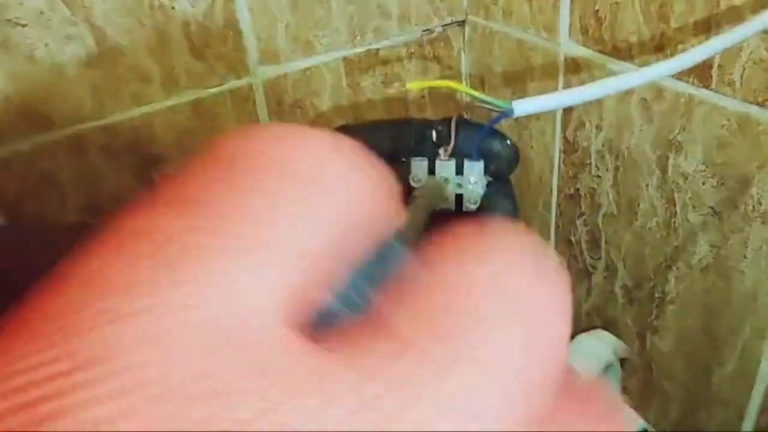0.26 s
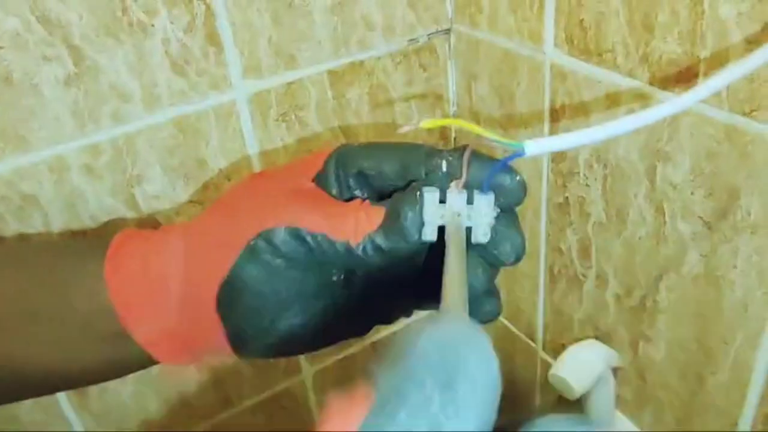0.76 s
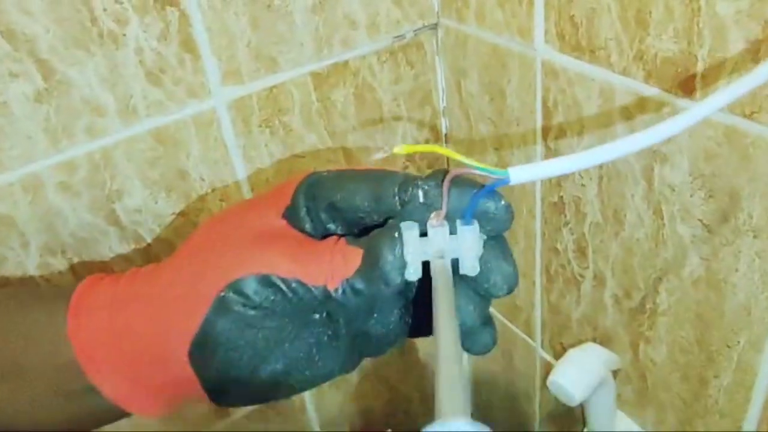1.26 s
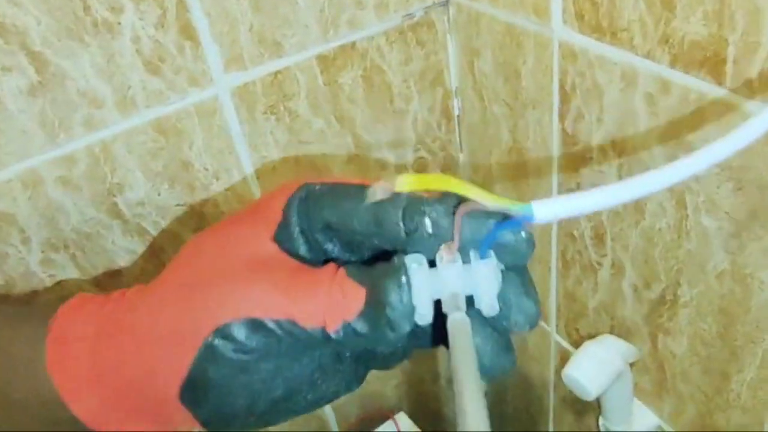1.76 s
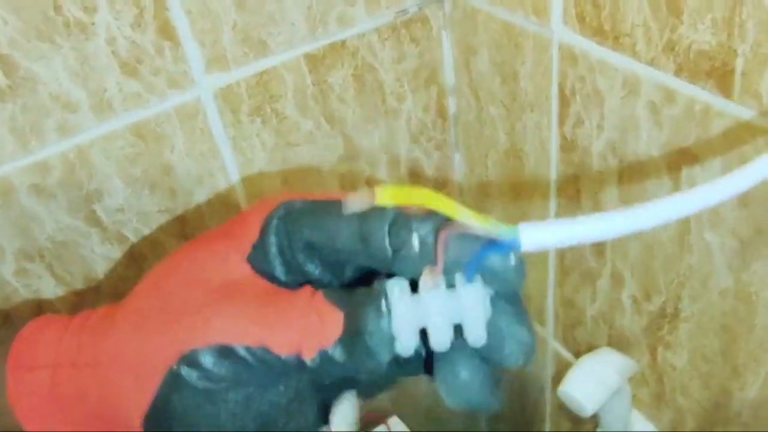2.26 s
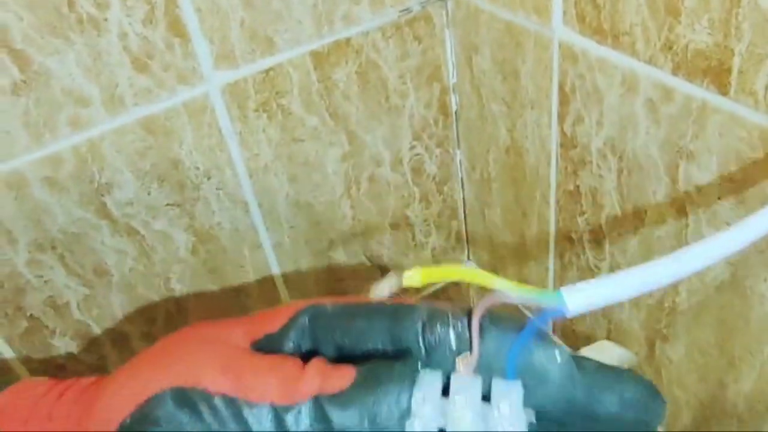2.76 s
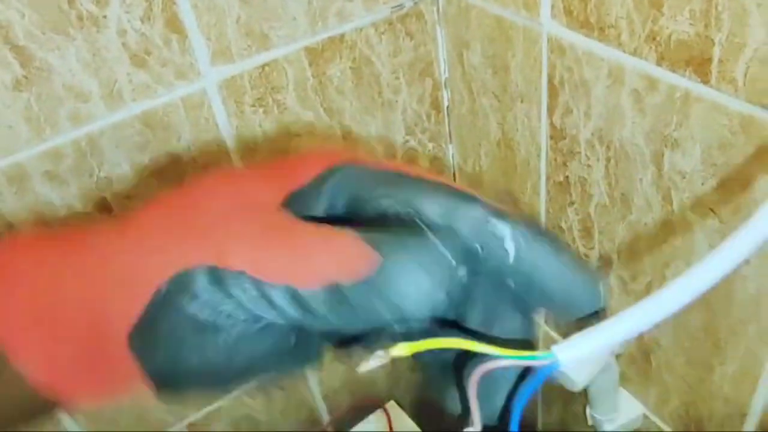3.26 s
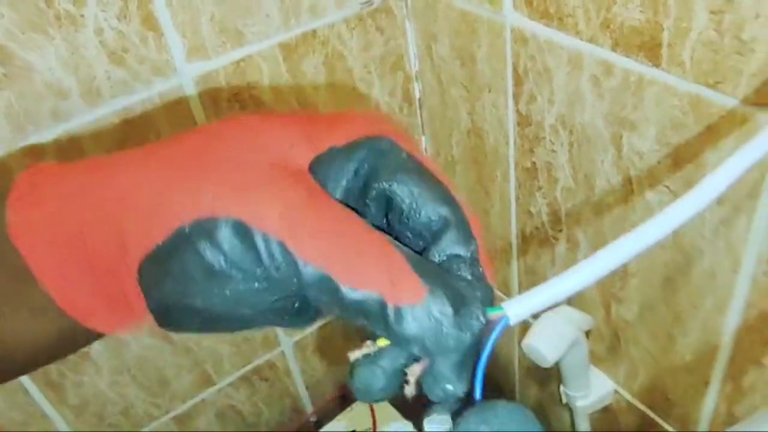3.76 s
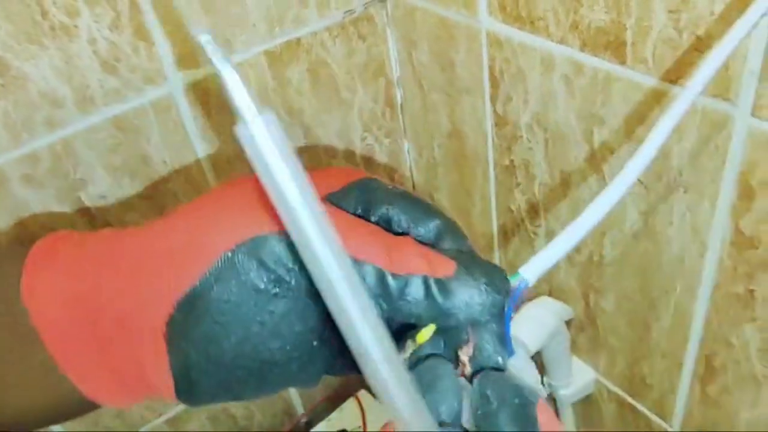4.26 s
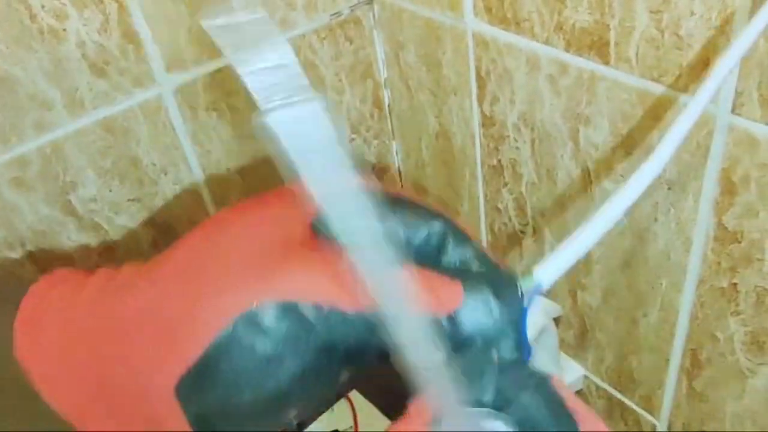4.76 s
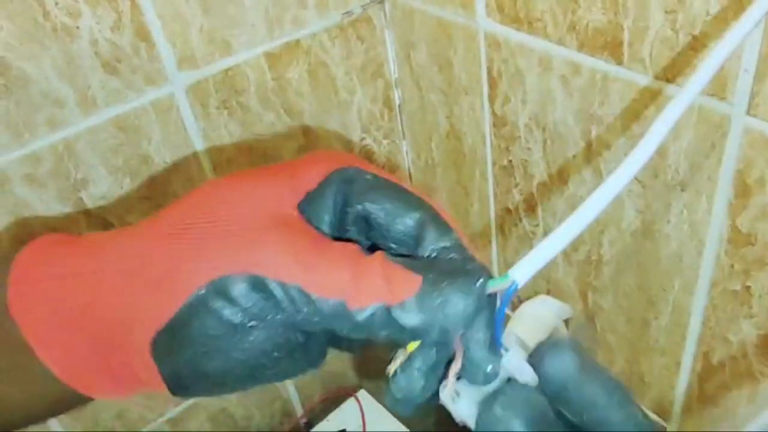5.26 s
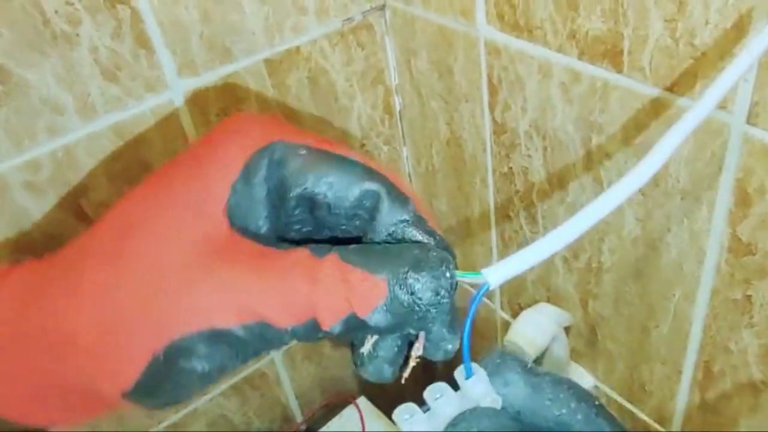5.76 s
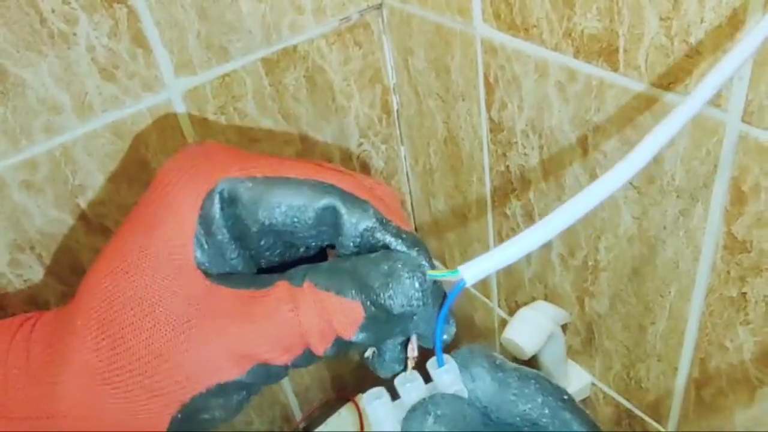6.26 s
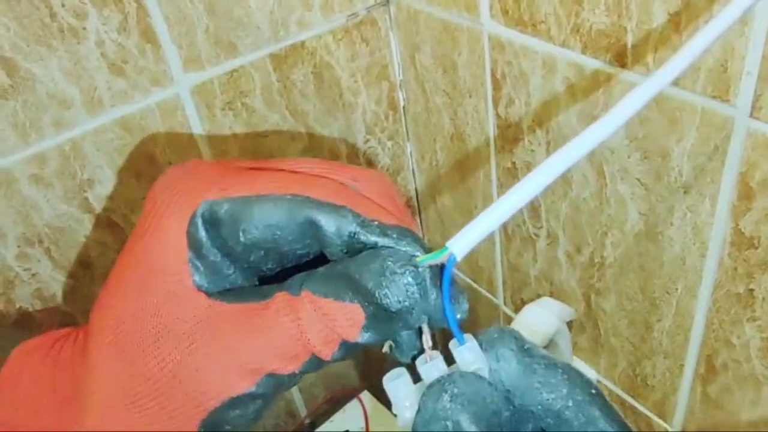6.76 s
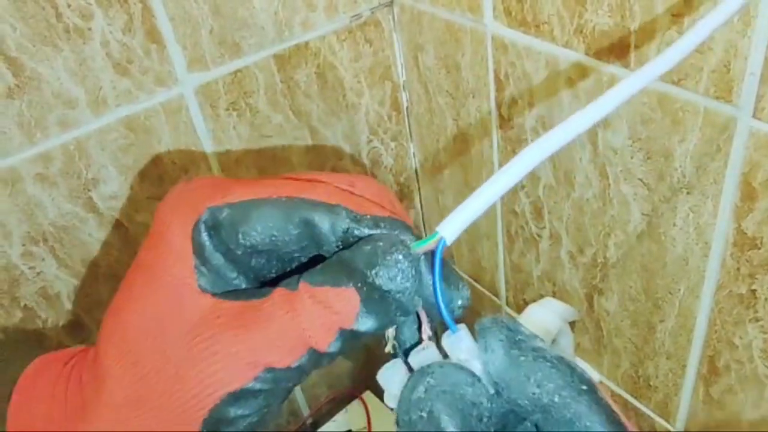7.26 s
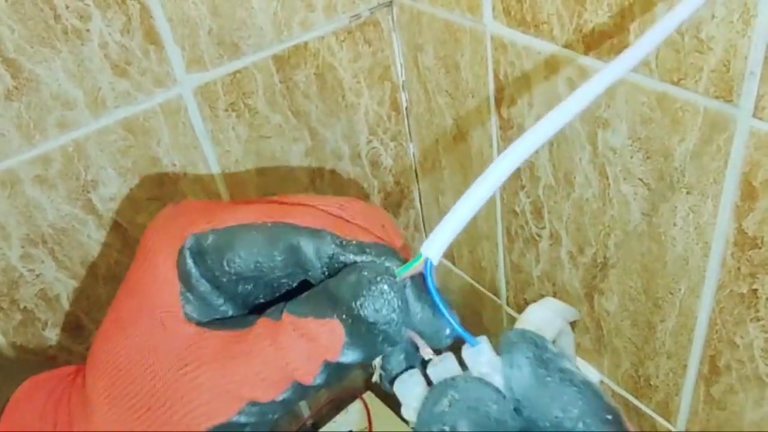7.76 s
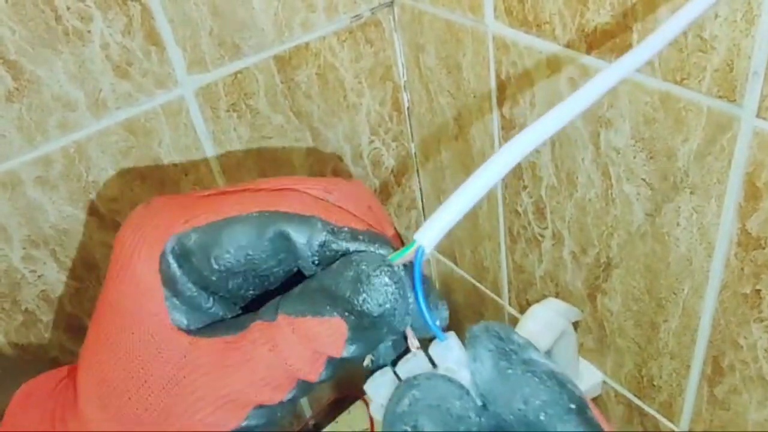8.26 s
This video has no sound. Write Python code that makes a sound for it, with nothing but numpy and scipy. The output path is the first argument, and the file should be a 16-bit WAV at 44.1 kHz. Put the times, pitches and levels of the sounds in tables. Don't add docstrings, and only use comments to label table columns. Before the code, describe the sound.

Close bursts of scratchy rubber-glove creaks and sharp screwdriver clicks over constant fan hum, thinning to light plastic rattles and finally barely audible sticky ticks.

```python
import sys
import numpy as np
from scipy import signal
from scipy.fft import rfft, irfft, next_fast_len
from scipy.io import wavfile
from scipy.ndimage import uniform_filter1d, map_coordinates

SR = 44100
rng = np.random.default_rng(int(sys.argv[2]) if len(sys.argv) > 2 else 0)


def bounce(signal):
    frames = np.transpose(np.atleast_2d(signal))
    limited = np.clip(frames, -1, 1)
    pcm = np.round(limited * 32767).astype(np.int16)
    wavfile.write(sys.argv[1], SR, pcm)


def gain_from_decibels(decibels):
    exponent = np.asarray(decibels, float) / 20
    return 10 ** exponent


N = 375291

# freq_hz, density_db_per_hz
DUCT_RUMBLE = [(25, -75), (45, -74.5), (65, -68), (130, -67.5), (175, -74), (260, -80), (350, -81.5),
               (500, -82), (650, -86), (900, -86.2)]
# freq_hz, density_db_per_hz
AIR_LEFT = [(900, -86.5), (1150, -95), (1400, -92), (1800, -93), (2600, -91.5), (3800, -104.4),
            (5000, -102.8), (5700, -111.4), (6900, -92.5), (7500, -103.8), (8200, -132.8), (9200, -140.0),
            (10300, -127.4), (15000, -132.2)]
AIR_RIGHT = [(900, -86.5), (1200, -96), (1400, -88.5), (1700, -100.8), (2000, -103.4), (2500, -109.3),
             (3200, -114.8), (4500, -117.0), (6500, -123.3), (8500, -130.9), (9500, -128.6),
             (11000, -116.2), (12800, -124.7), (15000, -131.9)]
# freq_hz, width_hz, left_db, right_db
ROOM_MODES = [(145.7, 7.3, 7, 6), (223, 28, 7.5, 12), (317.4, 25, 10.5, 4.5), (366, 14, 5.5, 6.5),
              (434.5, 8.6, 7, 13), (588, 20, -4, 11), (733, 79, 9.5, 8), (830.6, 26, 6.5, -0.5),
              (1049, 26, 11.5, 6.5), (1150, 72, -1, -1.5)]
# freq_hz, correlation
PORT_LIKENESS = [(60, 0.93), (130, 0.86), (290, 0.86), (640, 0.58), (1410, 0.062), (3100, 0.09),
                 (6820, 0.13), (15000, 0.11)]
MOTOR_MULTIPLES = [1, 2, 8, 13, 14, 25.7, 50.71, 107.24]
# left_rms_db, right_rms_db, unsteadiness_db
MOTOR_TONES = [(-30, -31, 0.84), (-48, -52.5, 0), (-73, -66.5, 3.5), (-74.5, -87, 1), (-67.5, -79.5, -1),
               (-79, -99, 3), (-85.5, -104, 3.5), (-108, -94, 4)]
BUZZ_HZ, ROTOR_HZ = 100.01, 12.85
WHINE_DB, BEAT_DB, BEAT_S, BEAT_PEAK_S = -72, 7.5, 0.56, 4.42
# freq_hz, t60_s
TILE_DECAY = [(500, 0.15), (1500, 0.12), (4000, 0.05), (10000, 0.071)]

# freq_hz, density_db_per_hz
NEAR_LEFT = [(400, -71.5), (800, -78), (1300, -82.5), (1800, -69.5), (2700, -65.5), (3800, -70.5),
             (5600, -67), (6800, -63.5), (7500, -67.5), (8300, -86.5), (9200, -100.5), (10500, -98.5),
             (12500, -97.5), (15000, -103)]
NEAR_RIGHT = [(400, -79), (800, -76), (1100, -80), (1300, -78.5), (2500, -73.5), (4200, -81), (5500, -80),
              (7500, -95), (8600, -95), (9300, -81.5), (10300, -71), (11500, -72.5), (13000, -83.5),
              (15000, -97)]
# time_s, rustle_left_port_db, scratch_right_port_db
HAND_FACING = [(0, -17, -2), (.6, -4, 3.5), (1.0, -5.5, 2.5), (1.3, 5, 3), (1.6, 8, 5), (2.1, 9.5, -1),
               (2.5, 3, 0.5), (3.2, 1.5, -3.5), (4.9, -10, 2), (5.5, -4, 0), (8.5, -4, -6.5)]

# start_s, peak_db, pitch_hz, left_over_right_db
SHAFT_RINGS = [(0.0782, -25, 7200, 23), (0.182, -18, 4470, 15.0), (0.1899, -17, 4240, 8.5),
               (0.3641, -32, 6250, 12), (0.3909, -26, 6400, 7), (0.4747, -23, 6900, 13),
               (0.5027, -20, 6600, 10.5), (0.5481, -12, 6200, 15.5), (0.6359, -31.5, 6660, 23),
               (0.6599, -23, 6820, 15), (0.6938, -26, 5160, 12.0), (0.7128, -9, 4800, 8),
               (0.7244, -28, 6710, 15.0), (0.7672, -26, 5170, 9), (0.9323, -26, 7120, 20),
               (0.9512, -22, 4530, 7.0), (0.9627, -28, 4020, 6), (0.9782, -22, 6700, 13.5),
               (0.9911, -8, 6600, 15), (1.047, -23, 4790, 7.0), (1.1962, -27, 6580, 9),
               (1.2101, -13, 3900, 2), (1.2174, -12, 4650, 8), (1.233, -28, 6810, 8.5),
               (1.2444, -22, 6940, 10), (1.2694, -18, 6910, 15.0), (1.3199, -28, 6170, 12.5),
               (1.4799, -26, 6200, 6), (1.505, -16, 6500, 14.5), (1.509, -10, 6520, 9),
               (1.5134, -17.5, 4270, 5.5), (1.5274, -20.5, 7200, 13.5), (1.7269, -45, 6140, 8.0),
               (1.7368, -26, 6540, 1), (1.7559, -14, 5840, 12.0), (1.7694, -24, 6900, 12),
               (1.8297, -20, 7200, 13), (1.9854, -40, 6700, 1), (1.9938, -25, 7040, 11.5),
               (2.0137, -19, 7100, 13.0), (2.0244, -15, 7430, 15), (2.0822, -26, 6820, 16.0),
               (2.6145, -25, 5900, 7), (2.7437, -44, 7000, 12), (2.8185, -11, 6740, 13),
               (2.8284, -28, 6870, 15.5), (4.9174, -18.5, 5310, 10.0), (4.9207, -12.5, 4270, 12.0),
               (5.2314, -41, 6260, 15), (5.2494, -25, 4420, 9.0)]
# start_s, peak_db, pitch_hz, left_over_right_db
BLOCK_POCKS = [(0.0992, -36, 2310, 3), (0.2169, -33, 2130, 3.5), (0.5116, -20, 1420, -1),
               (0.9782, -24, 2840, 12), (1.05, -32, 2560, 7), (1.236, -18, 2770, 7.5),
               (1.5156, -15, 1410, 5.0), (1.8397, -28, 3020, 6.5), (1.9929, -16, 2200, 7.5),
               (2.0827, -28, 2380, 10), (2.482, -23, 2210, 7.5), (2.7432, -27, 2710, 7.0),
               (2.8285, -19, 2470, 7.5), (2.9961, -25, 2520, 13.5), (3.1699, -23.5, 1930, 5.0),
               (3.2824, -36, 2330, 9.5), (4.8998, -24, 2210, 4.0), (4.9216, -17, 2200, 7.5),
               (5.2394, -25, 2870, 8), (5.2544, -28, 2660, 7.0)]
# start_s, peak_db, left_over_right_db
RUBBER_SNAPS = [(0.0448, -38, -34), (0.183, -44, -39), (0.2164, -44, -27.5), (0.3574, -47, -21.5),
                (0.388, -42, -17.0), (0.4758, -28.5, -16), (0.4981, -28, -23), (0.6614, -42, -29.5),
                (0.7122, -21, -19.5), (0.9732, -30.5, -15.0), (1.2092, -39, -8), (1.2236, -32.5, -8),
                (1.234, -28.5, -3), (1.3194, -38, -15.0), (1.4909, -39, -11), (1.5083, -31.5, -7.5),
                (1.5139, -28, -6), (1.736, -35, -15.5), (1.8292, -27, -17), (1.9954, -41, -14.5),
                (2.0153, -34, -8.5), (2.4831, -32, -1.5), (2.744, -28.5, -16.5), (2.818, -28.5, -12.5),
                (2.8947, -33, -17.5), (3.1702, -36, -18.5), (4.872, -45, -25.0), (4.9019, -38.5, -21.5),
                (4.918, -27, -17)]

# start_s, peak_db, fine_re_peak_db, t60_s
RUBBER_TICKS = [(3.806, -59, -5, 0.033), (3.8261, -50.5, 0, 0.028), (4.6317, -66, 4, 0.032),
                (6.3058, -61.5, -9, 0.031), (6.79, -53, -34, 0.045), (7.1553, -54, -25.5, 0.05),
                (7.254, -51.5, -13.5, 0.04), (7.3347, -57.5, -6.5, 0.085), (7.4788, -52, -37, 0.048),
                (8.195, -48.5, -20, 0.025), (8.3403, -53, -9.5, 0.03), (8.4444, -53, -18, 0.04)]
# start_s, peak_db, knock_re_peak_db, ring_re_peak_db
BLADE_SLIPS = [(0.058, -37.5, -21, -28), (0.182, -18.5, -31, -23), (0.3912, -21, -38, -9),
               (0.475, -17.5, -33, -29), (0.5048, -17.5, -7.5, -2), (0.5492, -18.5, -17, -26),
               (0.6599, -37, -27, -20), (0.712, -14.5, -21, -5.5), (0.9511, -15.5, -35, -11),
               (0.9632, -26, -18, 1), (0.994, -19, -19, -5), (1.2106, -37, -25, -18),
               (1.2344, -16.5, -7, -12), (1.27, -26, -27, -13), (1.3204, -26.5, 1.5, -1),
               (1.48, -27, -23, -2), (1.507, -10.5, -22, -17.5), (1.508, -0.5, -22, -38.5),
               (1.512, -7.5, -15, -20), (1.5284, -20.5, -26.5, -26), (1.739, -26.5, -35, -26),
               (1.77, -8.5, -38, -17), (1.83, -19.5, -15, -24), (2.0144, -9.5, -21, -42),
               (2.2706, -21, -20, -3), (2.2794, -30, -19, -23)]
# start_s, peak_db,
# knock_re_peak_db, ring_re_peak_db, pitch_hz
BLADE_SEATS = [(0.0967, -38, -17, 3.5, 2050), (0.1892, -30, -29, 4.5, 3400), (0.2167, -30.5, -8, 6, 2100),
               (0.5122, -25.5, 11, 4, 1730), (0.7674, -28, -9, 3, 3120), (0.8677, -44.5, -13, 7, 2360),
               (0.978, -14.5, -9.5, 1.5, 2740), (1.049, -23, -4.5, -2, 2370), (1.0602, -32, 1, 9.5, 2500),
               (1.1314, -47, -3, 9.5, 2520), (1.196, -42.5, -29, 11, 2940), (1.3972, -39, -12, 5, 2390),
               (1.2363, -23.5, 4, 9, 2340), (1.5163, -28, 6, -5, 1700), (1.5814, -32.5, -3.5, 3.5, 2160),
               (1.6633, -38, -27, 2, 1600), (1.8417, -22, -6.5, 0.5, 3080), (1.924, -50, 1, 15.5, 2400),
               (1.995, -19, -40, 6.5, 2190), (2.0811, -22, -25, 2.5, 2380), (2.0918, -31.5, -5.5, 5, 2360),
               (2.1714, -50, -12, 9, 1730), (3.1705, -22, -6, 1, 2420), (4.9003, -30.5, -4, 8, 2220),
               (4.915, -24.5, -5, 3, 2400), (4.9222, -12, -13.5, 2, 2130), (5.232, -32, -20, 8, 2670),
               (5.241, -33, -22, 3, 2820), (5.25, -30, -24, 4.5, 2670), (5.259, -30, -20, 6.5, 2930)]
# start_s, peak_db, ring_re_peak_db, fine_re_peak_db, pitch_hz
RATTLES = [(2.4736, -25, -32, -22, 2920), (2.4828, -27.5, 13.5, -11.5, 2180), (2.616, -20.5, -5, -18, 3050),
           (2.7436, -21, 3, -14.5, 2890), (2.819, -12, -61, -18.5, 2990), (2.8267, -39, 20.5, -10, 2090),
           (2.894, -35, -5, -5.5, 1920), (2.9964, -41.5, 17, -32, 2590), (3.147, -41, 5, -27, 2740),
           (3.215, -20, -20, -25, 2540), (3.284, -33.5, 6, -26, 2350), (3.7854, -36, -14, -9, 1920),
           (3.9425, -35.5, -1, -31, 2340), (4.0248, -33, 1, -17, 2900), (4.0662, -38.5, 6, -8, 2230),
           (5.2225, -40, -7, -14, 2750), (5.375, -44, 4, -24, 2560), (5.458, -43, 5, -17, 2420)]
BLADE_FINE_DB, BLADE_RING_HZ, SEAT_FINE_DB, RATTLE_KNOCK_DB = -27.5, 2740, -18.5, -7

# full_grip_s, build_s, hold_s, effort_db, ring_re_effort_db
TURNS = [(0.089, 0.15, 0.045, -45.5, -13.5), (0.18, 0.027, 0.034, -45, -5),
         (0.392, 0.079, .015, -33, -13.5), (0.501, 0.062, 0.0049, -29.5, -10), (0.548, .03, 0.01, -45, -10),
         (0.658, .035, 0.011, -34.5, -8), (0.7, 0.13, 0.042, -36, -13.5),
         (0.967, 0.067, 0.04, -32.5, -11.5), (1.209, 0.042, 0.05, -32.5, -8.5),
         (1.302, .04, 0.012, -42.5, -3.5), (1.508, 0.065, 0.0041, -28, -8),
         (1.55, .04, 0.027, -43.5, -12.5), (1.737, 0.023, 0.039, -32, -7), (1.818, .04, 0.019, -43.5, -7),
         (1.992, 0.041, 0.04, -32.5, -3), (2.08, 0.029, 0.0062, -46.5, -3), (2.242, .035, 0.033, -45, -2.5)]
# full_grip_s, hold_s, effort_db,
# ring_re_effort_db, fine_re_effort_db
SHIFTS = [(0.0, 2.53, -65, -6.5, -22), (2.505, 0.404, -55, -3, -10), (3.046, .1, -71, -8, -24),
          (3.304, 0.29, -70.5, -14, -33), (2.48, 0.0049, -45, -4, -11.5), (2.594, 0.035, -48, -5, -16),
          (2.652, 0.039, -49, -8, -16), (2.745, 0.02, -40.5, -12.5, -7.5), (2.819, 0.0044, -33, -8, -13.5),
          (2.863, 0.024, -65, 10, -6), (2.95, 0.053, -51, -1.5, -15), (3.166, 0.038, -51, 2, -11.5),
          (3.26, 0.0066, -47.5, -8, -27), (3.807, 0.029, -68.5, 6, 2), (3.867, 0.11, -65, 1, -31),
          (4.017, 0.065, -59, 4.5, -15), (4.875, 0.028, -50.5, 2, -11.5), (4.92, 0.0044, -35, -0.5, -8.5),
          (5.097, 0.079, -63.5, 0, -13), (5.177, 0.026, -52, 1.5, -4.5), (5.22, 0.035, -42, -7, -12.5),
          (5.37, .015, -61, -3, -27), (5.47, 0.026, -60.5, 4.5, -10), (4.977, .55, -68, -0.5, -22)]
SWING_DB, LET_GO_DB_PER_S = 36.5, 380
SHIFT_BUILD_S, SHIFT_LET_GO_DB_PER_S = 0.05, 306.5
LINGER_DB, LINGER_DB_PER_S = -24, 110
FINE_BUILD_STEEPER, FINE_FADE_STEEPER = 0.028, 0.45
TURN_FINE_DB, KNOCK_DB, KNOCK_PER_RING = -12.5, -5, 0.63


def unit(x):
    return x / np.sqrt(np.mean(x ** 2, axis=-1, keepdims=True) + 1e-20)


def along(points, hz):
    f, v = np.transpose(points)
    return np.interp(np.log(hz + 1), np.log(f + 1), v)


def wobble(rate):
    knots = rng.standard_normal(int(N * rate / SR) + 4)
    return map_coordinates(knots, [np.arange(N) * rate / SR])


def filtered(x, response):
    m = next_fast_len(N + SR // 2)
    return irfft(rfft(x, m) * response(np.fft.rfftfreq(m, 1 / SR)), m)[..., :N]


def patchy(x, depth_db, count_hz, count_s, size=512):
    z = signal.stft(x, nperseg=size)[2]
    field = uniform_filter1d(rng.standard_normal(z.shape[1:]), count_hz, axis=0)
    field = uniform_filter1d(field, count_s, axis=1)
    return unit(signal.istft(z * gain_from_decibels(depth_db * field / field.std()), nperseg=size)[1][:, :N])


def rush(patchy_db):
    pair = patchy(rng.standard_normal((2, N)), patchy_db, count_hz=6, count_s=14) * np.sqrt(SR / 2)

    def mid_side(hz):
        angle = np.arccos(np.clip(along(PORT_LIKENESS, hz), -1, 1)) / 2
        return np.array([np.cos(angle), np.sin(angle)])

    mid, side = filtered(pair, mid_side)
    return np.array([mid + side, mid - side])


def fan_air():
    def colour(hz):
        level_db = np.array([along(DUCT_RUMBLE[:-1] + air, hz) for air in (AIR_LEFT, AIR_RIGHT)])
        for centre, width, left_db, right_db in ROOM_MODES:
            level_db += np.outer([left_db, right_db], 1 / (1 + (2 * (hz - centre) / width) ** 2))
        return gain_from_decibels(level_db)

    patchy_db = along([(500, 1.3), (2500, 1.5), (8000, 2.6)], np.fft.rfftfreq(512, 1 / SR))
    return filtered(rush(patchy_db[:, None]), colour)


def rotor_tone(hz, width_hz):
    return unit(filtered(rng.standard_normal(N), lambda f: 1 / (1 + (2 * (f - hz) / width_hz) ** 4)))


def fan_motor(blur=0.35, lead=0.15):
    t = np.arange(N) / SR
    phase = 2 * np.pi * BUZZ_HZ * t + np.array([[lead], [0]])
    out = 0
    for multiple, (left_db, right_db, unsteady_db) in zip(MOTOR_MULTIPLES, MOTOR_TONES):
        waver = rng.uniform(0, 2 * np.pi) + blur * unsteady_db * wobble(12)
        tone = np.sqrt(2) * np.sin(multiple * phase + waver)
        out = out + gain_from_decibels([[left_db], [right_db]]) * gain_from_decibels(unsteady_db * wobble(4.2)) * tone
    whine_db = WHINE_DB + BEAT_DB * np.cos(2 * np.pi * (t - BEAT_PEAK_S) / BEAT_S) + 3 * wobble(14)
    whine = np.sqrt(2) * np.sin(15 * phase + 1.3 * wobble(14))
    out = out + gain_from_decibels(whine_db + [[4], [-4]]) * whine
    below = rotor_tone(BUZZ_HZ - ROTOR_HZ, 14)
    above = rotor_tone(BUZZ_HZ + ROTOR_HZ, 0.86)
    return out + gain_from_decibels(-46.5) * below + gain_from_decibels(-51.5) * above


def tiles(x):
    hz, t, z = signal.stft(rng.standard_normal((2, SR // 3)), SR, nperseg=256)
    decay = gain_from_decibels(-60 * t / along(TILE_DECAY, hz)[:, None])
    tail = signal.istft(z * decay, SR, nperseg=256)[1]
    late = np.pad(x, ((0, 0), (200, 0)))
    return signal.fftconvolve(late, tail / np.linalg.norm(tail[0]), axes=1)[:, :N]


def port(points, size=2048):
    colour = gain_from_decibels(along(points, np.fft.rfftfreq(size, 1 / SR)))
    cepstrum = irfft(np.log(colour + 1e-9), size)
    cepstrum = np.concatenate([cepstrum[:1], 2 * cepstrum[1:size // 2], np.zeros(size // 2)])
    return irfft(np.exp(rfft(cepstrum)), size)


def voiced(drives):
    ports = np.array([port(NEAR_LEFT), port(NEAR_RIGHT)])
    bands = [((620, 1550), "band"), ((1300, 3200), "band"), ((3250, 7900), "band"), (9300, "high")]
    out = 0
    for drive, (edge, kind) in zip(drives, bands):
        part = signal.sosfilt(signal.butter(4, edge, kind, fs=SR, output="sos"), ports)
        out = out + signal.oaconvolve(drive[:, :N], 2 * part / np.linalg.norm(part), axes=1)[:, :N]
    return out


def facing():
    s, left_db, right_db = np.transpose(HAND_FACING)
    gain, t = np.ones((4, 2, N)), np.arange(N) / SR
    gain[3, 0] = gain_from_decibels(np.interp(t, s, left_db))
    gain[2, 1] = gain_from_decibels(np.interp(t, s, right_db))
    return gain


def shaft(ring_db=-5, ring_t60=0.01, split=0.057, snap_db=-3, snap_t60=0.012, rise=0.0019):
    t = np.arange(SR // 20) / SR
    start = 1 - np.exp(-t / rise)
    rings, snaps = np.zeros((2, 2, N + len(t)))

    def sides(pan_db):
        return gain_from_decibels(np.minimum([[pan_db], [-pan_db]], 0) + 9)

    for s, db, hz, pan_db in SHAFT_RINGS + BLOCK_POCKS:
        first, second = rng.uniform(0, 2 * np.pi, (2, 2, 1))
        pair = np.sin(2 * np.pi * hz * t + first)
        pair = pair + 0.45 * np.sin(2 * np.pi * hz * (1 + split) * t + second)
        fade = gain_from_decibels(db + ring_db - 60 * t / ring_t60) * start
        rings[:, round(s * SR):][:, :len(t)] += fade * pair * sides(pan_db)
    for s, db, pan_db in RUBBER_SNAPS:
        fade = gain_from_decibels(db + snap_db - 60 * t / snap_t60) * start
        snaps[:, round(s * SR):][:, :len(t)] += fade * rng.standard_normal((2, len(t))) * sides(pan_db)
    bright = signal.butter(3, (9700, 13500), "band", fs=SR, output="sos")
    return (rings + signal.sosfilt(bright, snaps))[:, :N]


def contacts():
    snap_t60 = 0.0081
    hits = [(*row, BLADE_FINE_DB, BLADE_RING_HZ, snap_t60) for row in BLADE_SLIPS]
    for s, db, knock_db, ring_db, hz in BLADE_SEATS:
        hits.append((s, db, knock_db, ring_db, SEAT_FINE_DB, hz, snap_t60))
    for s, db, ring_db, fine_db, hz in RATTLES:
        hits.append((s, db, RATTLE_KNOCK_DB + 0.28 * ring_db, ring_db, fine_db, hz, snap_t60))
    for s, db, fine_db, t60 in RUBBER_TICKS:
        hits.append((s, db, -22, -9, fine_db, 2600, t60))
    return hits


def clicks(lag_count=5, rise=0.00051, ring_t60=0.0098):
    t = np.arange(SR // 16) / SR
    start = 1 - np.exp(-t / rise)
    tracks = np.zeros((4, 2, N + len(t) + lag_count))
    for s, db, knock_db, ring_db, fine_db, hz, t60 in contacts():
        fade = gain_from_decibels(-60 * t / np.clip(t60, 0.002, 0.08)) * start
        noise = rng.standard_normal((3, len(t)))
        crack = (noise[0] + 1.4 * noise[1:]) * fade
        crack = crack * np.linalg.norm(fade) / np.linalg.norm(crack, axis=1, keepdims=True)
        mode = 0.32 * np.sin(2 * np.pi * hz * t) * gain_from_decibels(-60 * t / ring_t60) * start
        levels = gain_from_decibels(db - 6.5 + np.array([knock_db + 6.5, ring_db, 0, fine_db + 7.5]))
        parts = levels[:, None, None] * [crack, crack + mode, crack, crack]
        at = round(s * SR)
        tracks[:, 0, at + lag_count:at + lag_count + len(t)] += parts[:, 0]
        tracks[:, 1, at:at + len(t)] += parts[:, 1]
    return tracks[..., :N]


def grip():
    t, power = np.arange(N) / SR, np.zeros((4, N))
    strokes = [(*row, TURN_FINE_DB, LET_GO_DB_PER_S) for row in TURNS]
    for s, *rest in SHIFTS:
        strokes.append((s, SHIFT_BUILD_S, *rest, SHIFT_LET_GO_DB_PER_S))
    for s, build, hold, db, ring_db, fine_db, let_go in strokes:
        on = slice(max(round((s - 0.3) * SR), 0), round((s + hold + 0.45) * SR))
        after = np.maximum(t[on] - s - hold, 0)
        change_db = -SWING_DB * np.maximum(s - t[on], 0) / build
        change_db = change_db + np.maximum(-let_go * after, LINGER_DB - LINGER_DB_PER_S * after)
        level_db = db + change_db + [[KNOCK_DB + KNOCK_PER_RING * ring_db], [ring_db], [0], [fine_db]]
        level_db[3] += np.where(t[on] < s, FINE_BUILD_STEEPER, FINE_FADE_STEEPER) * change_db
        power[:, on] += gain_from_decibels(level_db) ** 2
    return np.sqrt(power)


def glove(slip_rate=2400, size_db=2.0, hiss=0.98, flutter_db=1.7, shared=0.72):
    chance = slip_rate / SR * gain_from_decibels(4 * wobble(150))
    slips = (rng.random(N) < chance) * gain_from_decibels(size_db * rng.standard_normal(N))
    signs = rng.standard_normal((3, N))
    grains = unit(slips * (shared * signs[0] + signs[1:])) + hiss * rng.standard_normal((2, N))
    drive = patchy(grains, depth_db=4.0, count_hz=5, count_s=4, size=256)
    drive = drive * gain_from_decibels(flutter_db * wobble(50) - 2.5)
    return drive * (gain_from_decibels([[-3.5], [0.5], [0], [2.5]]) * grip())[:, None]


def scene():
    hands = voiced((glove() + clicks()) * facing()) + shaft()
    return hands + gain_from_decibels(-11) * tiles(hands) + fan_air() + fan_motor()


def band_limit(x):
    return signal.sosfilt(signal.butter(12, 15690, fs=SR, output="sos"), x)


def record(dry):
    soft = filtered(dry, lambda hz: 1 / (1 + (hz / 15450) ** 40))
    return band_limit(soft)


dry = scene()
out = record(dry)
bounce(out)
```